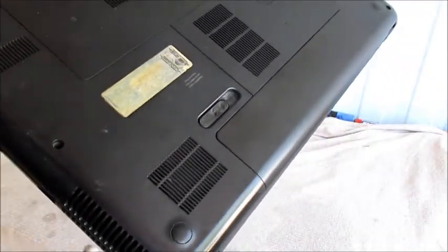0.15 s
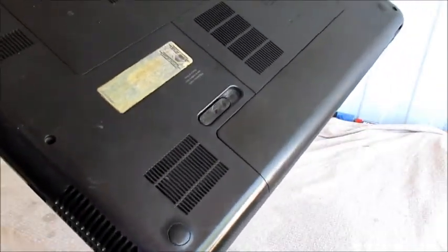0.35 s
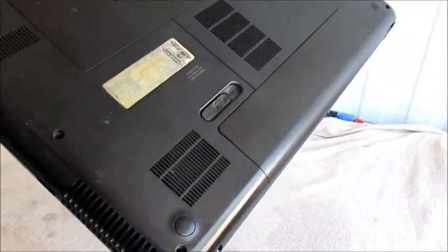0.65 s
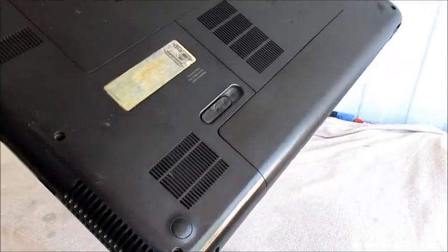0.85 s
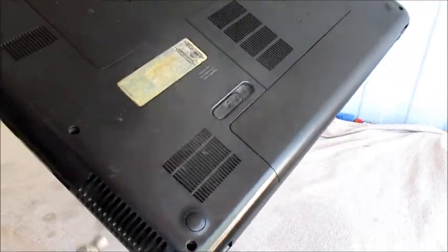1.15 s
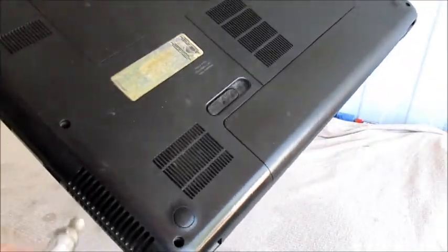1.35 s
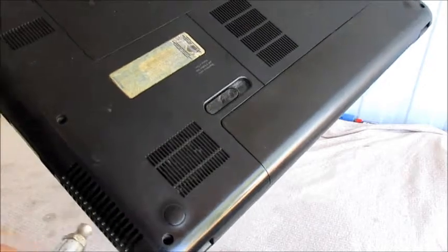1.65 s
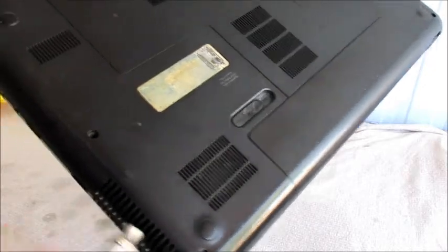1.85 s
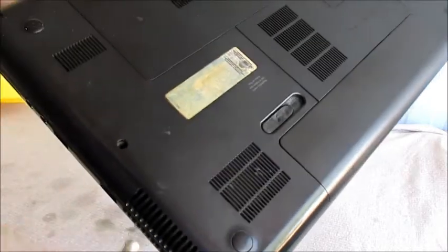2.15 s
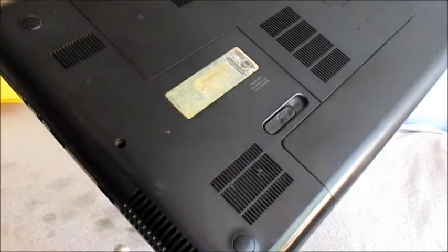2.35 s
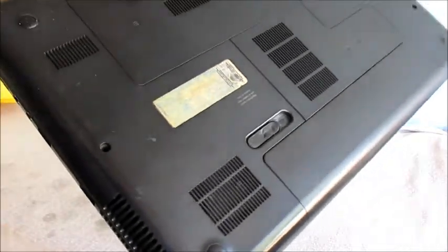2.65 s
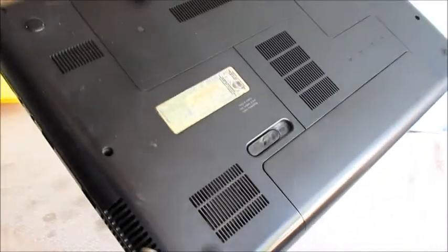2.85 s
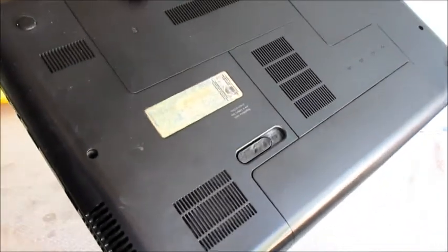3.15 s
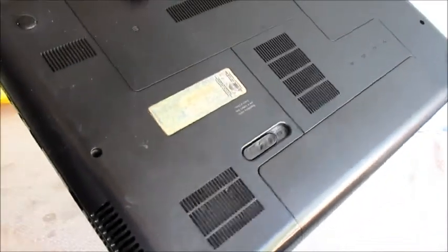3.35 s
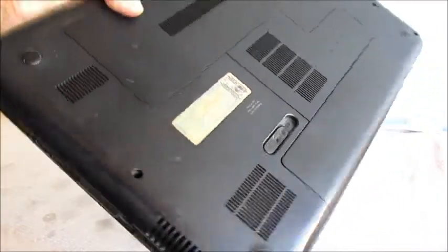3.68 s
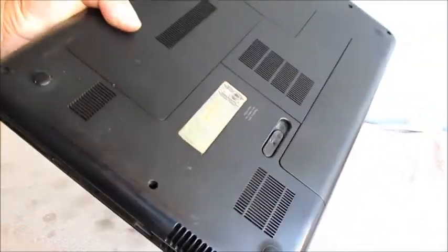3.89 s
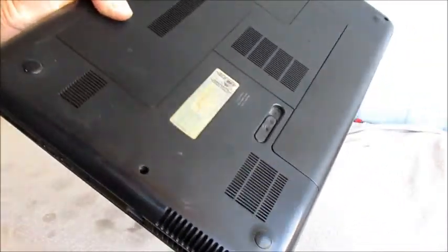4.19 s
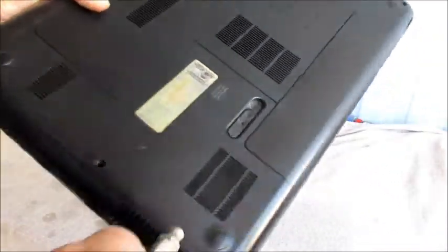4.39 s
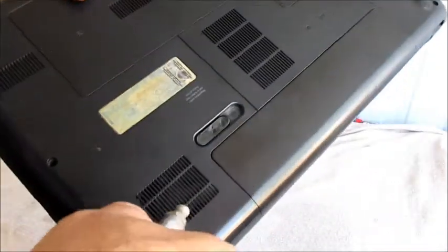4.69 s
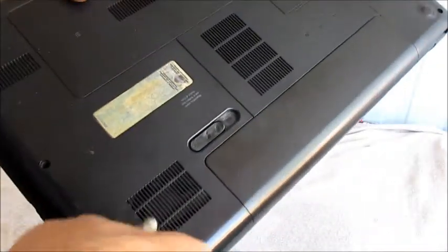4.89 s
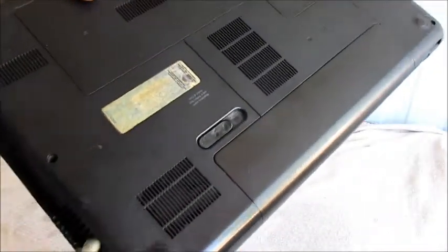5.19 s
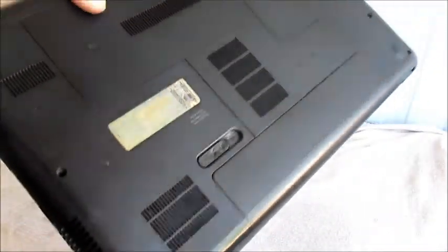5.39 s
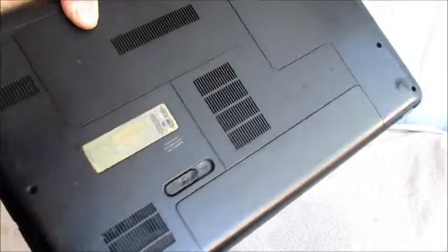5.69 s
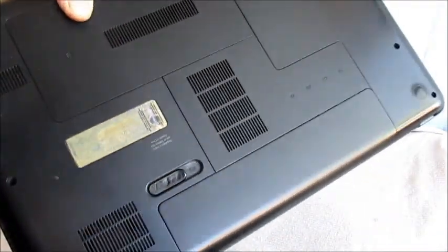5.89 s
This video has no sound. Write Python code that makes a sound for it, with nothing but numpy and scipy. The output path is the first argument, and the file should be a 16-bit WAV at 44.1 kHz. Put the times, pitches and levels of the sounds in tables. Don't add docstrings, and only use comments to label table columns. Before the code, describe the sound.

Repeated harsh bursts of compressed air hiss and roar into a plastic laptop vent, the first spinning its fan into a brief whine.

```python
import sys
import numpy as np
from scipy import signal
from scipy.fft import rfft, irfft, next_fast_len
from scipy.io import wavfile

SR = 44100
rng = np.random.default_rng(int(sys.argv[2]) if len(sys.argv) > 2 else 0)


def how_loud(loudness_db):
    steps = np.asarray(loudness_db, float) / 20
    return 10 ** steps


def to_wav(sig):
    pcm = np.clip(np.atleast_2d(sig), -1, 1) * 32767
    pcm = np.round(pcm).astype(np.int16)
    wavfile.write(sys.argv[1], SR, pcm.T)


N = 265923
SIZE = next_fast_len(N)
HZ = np.maximum(np.arange(SIZE // 2 + 1) * SR / SIZE, 1.0)
TIME = np.arange(N) / SR
CONTROL_STEP = 64


def rms_one(x):
    return x / np.sqrt(np.mean(x ** 2) + 1e-20)


def in_time(rows, off=None):
    s, *columns = np.transpose(rows)
    return [np.interp(TIME, s, c, left=off, right=off) for c in columns]


def at_hz(points, hz):
    p = np.array(points, float)
    return np.interp(np.log(hz), np.log(np.maximum(p[:, 0], 1.0)), p[:, 1])


def white():
    return rfft(rng.standard_normal(SIZE))


def drift(rate_hz):
    r = np.exp(-80 * np.pi * rate_hz / SR)
    noise = rng.standard_normal(N // 40 + 2002)
    slow = signal.lfilter([1], [1, -2 * r, r * r], noise)[2000:]
    return np.interp(np.arange(N) / 40, np.arange(len(slow)), rms_one(slow))


def humps(s, half_s):
    coarse_s = np.arange(N // CONTROL_STEP + 2) * CONTROL_STEP / SR
    distance = (coarse_s - s[:, None]) / np.maximum(half_s[:, None], .005)
    return np.exp(-.5 * distance ** 2)


def full(coarse):
    return np.interp(np.arange(N) / CONTROL_STEP, np.arange(len(coarse)), coarse)


JET_CENTRES_HZ = [1700, 3600, 6800, 12500]
FREE_JET_DB = [-12.5, -10, -1.9, 1]
# pitch_hz, level_db (per Hz)
JET_COLOUR = [(290, -25), (500, -20.5), (1040, -11), (1590, 0), (2100, -5.5), (3110, -3), (3660, 0.5),
              (4230, -1.5), (5430, 5.5), (7380, 6.5), (7940, 10), (10200, 4.5), (13400, 9), (15800, 6.5),
              (16500, -51.5)]
# pitch_hz, shared_part (0-1)
PORT_LIKENESS = [(500, .7), (1400, .82), (2100, .95), (2600, .65), (3700, .8), (6000, .7), (12000, .68),
                 (15500, .55)]


def jet(patchy_db=1.29, flutter_db=0.74):
    flow_db = flow()
    ports = at_ports(white() * how_loud(at_hz(JET_COLOUR, HZ)), at_hz(PORT_LIKENESS, HZ))
    power = np.mean(np.abs(ports) ** 2, axis=0) * 2 / SIZE ** 2
    edges_hz = [1100, 2600, 4800, 9500, 16000]
    part_db = [10 * np.log10(power[(HZ > a) & (HZ < b)].sum()) for a, b in zip(edges_hz, edges_hz[1:])]
    out, together, last = 0, drift(25.0), drift(9.0)
    third = np.minimum(np.log2(HZ) * 3, 42)
    for k in range(27, 43):
        hz = np.clip(2 ** (k / 3), JET_CENTRES_HZ[0], 16000)
        free_db = at_hz(list(zip(JET_CENTRES_HZ, FREE_JET_DB)), hz)
        raw_db = at_hz(list(zip(JET_CENTRES_HZ, part_db)), hz)
        level_db = flow_db + strikes(hz, free_db) - raw_db
        own = drift(4.4)
        flicker_db = patchy_db * (own + 1.2 * last) + flutter_db * together
        mask = np.sqrt(np.clip(1 - np.abs(third - k), 0, 1))
        out = out + how_loud(level_db + flicker_db) * irfft(ports * mask, SIZE)[:, :N]
        last = own
    return out


# time_s, level_db
FLOW = [
    [(-0.001, -22.5), (0.137, -23), (0.184, -22), (0.351, -28.5), (0.458, -27), (0.535, -23)],
    [(0.94, -20), (1.066, -25), (1.125, -23), (1.237, -24.5), (1.4, -23.5), (1.448, -23.5), (1.615, -26.5),
     (1.721, -28.0), (1.8, -25)],
    [(1.961, -26.5), (2.081, -21.5), (2.172, -31), (2.213, -24), (2.327, -26), (2.399, -25), (2.482, -24.5),
     (2.629, -36.5), (2.69, -20)],
    [(2.815, -17), (2.904, -29), (2.96, -28.5), (3.048, -22), (3.195, -27), (3.28, -31.5), (3.31, -31.5),
     (3.452, -30), (3.515, -20.5)],
    [(3.879, -23.5), (3.987, -29), (4.116, -31), (4.163, -29), (4.267, -25.5), (4.41, -39.5),
     (4.469, -31.5)],
    [(4.599, -25.5), (4.721, -27.5), (4.812, -21), (4.887, -31.5), (4.96, -23.5), (5.065, -32),
     (5.177, -35), (5.268, -31), (5.33, -32.5)],
    [(5.829, -24.5), (5.955, -22), (6.019, -28.5)],
]


def flow():
    points = sorted(tuple(row) for sweep in FLOW for row in sweep)
    return in_time(points)[0] + valve()


# opens_s, held_back_before_db, creep_before_db_per_s, released_s, closing_db_per_s
TRIGGER = [
    (-.2, -12, 1000, .534, 1200),
    (.933, -12, 2500, 1.815, 330),
    (1.95, -12, 2500, 2.697, 650),
    (2.807, -19, 200, 3.524, 1100),
    (3.869, -14, 2500, 5.335, 560),
    (5.814, -12, 600, 6.5, 500),
]
RUSH_DB = [
    0,
    6.5,
    3,
    0.5,
    8,
    1,
]


def valve(rise_s=0.0017, rush_s=0.0083, bleed_db=-11, bleed_db_per_s=306):
    pulls = []
    for (s, held_db, creep, end, closing), rush_db in zip(TRIGGER, RUSH_DB):
        since, after = TIME - s, np.maximum(TIME - end, 0)
        opening = np.interp(since, [-1, -rise_s, 0], [held_db - creep, held_db, rush_db])
        spent = np.where(since > 0, rush_db * (1 - np.exp(-np.abs(since) / rush_s)), 0)
        release = np.maximum(-closing * after, bleed_db - bleed_db_per_s * after)
        pulls.append(opening - spent + release)
    return np.max(pulls, axis=0)


# time_s, half_length_s, level_db (over the flow), colour_octaves (over 1 kHz)
STRIKES = [(0.152, 0.037, -2.5, 2.44), (0.394, 0.019, -1, 2.1), (0.447, 0.064, -1.5, 2),
           (0.988, 0.022, -3.3, 2.33), (1.05, 0.029, 3.9, 2.62), (1.248, 0.025, -4, 2.5),
           (1.454, 0.03, 0.5, 2.87), (1.595, 0.038, -0.5, 2.83), (1.754, 0.12, -10, 1.6),
           (1.972, 0.024, 7.5, 2.25), (2.143, 0.015, 8, 2.8), (2.245, 0.053, 2.2, 3.03),
           (2.574, 0.043, 10.5, 3), (2.64, 0.021, 5, 1.5), (2.866, 0.018, 3.5, 2.6), (2.926, 0.03, 4, 1.2),
           (3.15, 0.13, -4.5, 1.8), (3.46, 0.063, -4.5, 2.8), (3.929, 0.023, 3.5, 1.82),
           (4.135, 0.022, 4, 0.4), (4.228, 0.044, 4, 3.08), (4.317, 0.011, 12, 2.75),
           (4.404, 0.036, 12.5, 1.95), (4.517, 0.037, 0.6, 1.27), (4.658, 0.049, 7, 2.86),
           (4.888, 0.029, 2.5, 2.03), (5.013, 0.0078, 1.5, 2.54), (5.152, 0.022, -1.5, 1.7),
           (5.327, 0.03, 7, 1.8), (6.01, 0.03, 5.5, 2.31)]
# time_s, level_db (over the flow)
FLICKS = [
    (.29, -6),
    (1.79, -1.5),
    (1.99, -7),
    (2.57, 11.5),
    (3.885, 3.5),
    (4.165, 8.5),
    (4.82, -12),
    (5.14, -7),
    (5.28, 6),
]
STRIKE_FALL_DB = (3.5, 2)


def strikes(hz, free_db, flick_half_s=0.0062, flick_octave=2.92, top_hz=8800, top_db=2.5):
    flicks = [(s, flick_half_s, db, flick_octave) for s, db in FLICKS]
    s, half_s, db, octave = np.transpose(list(STRIKES) + flicks)
    off = np.log2(hz / 1000) - octave
    fall_db = np.where(off < 0, *STRIKE_FALL_DB) * off ** 2
    fall_db = fall_db + top_db / (1 + (top_hz / hz) ** 12)
    struck = how_loud(db - fall_db) ** 2 @ humps(s, half_s)
    return full(10 * np.log10(how_loud(free_db) ** 2 + struck))


def off_the_case(x, share=0.24, lag_s=0.000437, wander=0.28):
    both = drift(2.3)
    lags = [lag_s * SR * np.exp(wander * both + 0.068 * drift(6.9)) for side in range(2)]
    bounced = [np.interp(np.arange(N) - lag, np.arange(N), v) for v, lag in zip(x, lags)]
    return (x + share * np.array(bounced)) / np.sqrt(1 + share ** 2)


# pitch_hz, left_leads_radians
PORT_PHASE = [(700, 0), (1500, .4), (2250, -.2), (2950, 1.0), (3950, .35), (4700, 1.4), (5350, .8),
              (6050, 1.9), (7300, 1.3), (8450, 2.1), (9200, 1.7), (9800, 2.4), (10500, 1.5), (15000, 1.9)]
# pitch_hz, left_minus_right_db
PORT_BALANCE = [(500, 1), (1200, -3), (2100, -.3), (2600, -6.5), (3400, 0), (4300, -2.5), (5150, 1),
                (5700, -1.5), (7200, 3), (7900, 1.3), (11300, 5.8), (12200, 3.2), (12900, 4), (14500, -.4)]


def at_ports(shared, alike):
    alike = np.clip(alike, 0, 1)
    turn = np.exp(.5j * at_hz(PORT_PHASE, HZ)) * how_loud(at_hz(PORT_BALANCE, HZ) / 2)
    own = []
    for side in range(2):
        echo = np.abs(shared) * np.exp(2j * np.pi * rng.random(len(HZ)))
        own.append(np.sqrt(alike) * shared + np.sqrt(1 - alike) * echo)
    return np.array([own[0] * turn, own[1] / turn])


# time_s, blade_rate_hz, level_db, overtones_db (relative)
FAN = [
    (.19, 690, -56, -12),
    (.21, 755, -47, -12),
    (.276, 950, -45, -14),
    (.326, 1006, -50, -10),
    (.372, 935, -41, 3),
    (.41, 760, -39, 6),
    (.46, 590, -38, 1),
    (.51, 490, -44, 0),
    (.555, 400, -52, -4),
]
# pitch_hz, width_hz, lift_db
GRILLE = (1650, 480, 17)
# start_s, length_s, from_hz, to_hz, level_db
WHISTLES = [
    (1.629, .07, 1060, 1204, -46),
    (2.279, 0.093, 1100, 1280, -38.5),
    (2.461, 0.11, 1660, 1670, -34.5),
    (3.235, 0.069, 650, 630, -47.5),
    (3.324, 0.035, 600, 570, -44),
    (3.372, 0.098, 610, 623, -49.5),
    (3.439, 0.058, 630, 650, -47),
]
# start_s, length_s, from_hz, to_hz,
# level_db
BREATHY_TONES = [
    (3.71, 0.1, 3800, 3690, -62.5),
    (5.64, .07, 3300, 3600, -62.5),
    (5.69, 0.082, 3950, 3950, -60),
    (4.2, 0.022, 3600, 6900, -61.5),
]


def whines(overtone_loss_db=3):
    hz, level_db, over_db = in_time(FAN, off=-120)
    centre, width, lift_db = GRILLE
    out = tone(hz, level_db, waver=0.0055)
    for k in range(2, 6):
        lift = lift_db / (1 + (2 * (hz * k - centre) / width) ** 2)
        out = out + tone(hz * k, level_db + over_db + lift - overtone_loss_db * k, waver=.004)
    out = out + sum(tone(*glide(*w), waver=.005) for w in WHISTLES)
    out = out + sum(tone(*glide(*w), waver=.05, rate_hz=300.0) for w in BREATHY_TONES)
    return irfft(at_ports(rfft(out, SIZE), 1.0), SIZE)[:, :N]


def tone(hz, level_db, waver, rate_hz=34.0):
    gain = np.sqrt(2) * how_loud(level_db + 1.1 * drift(22.0))
    phase = 2 * np.pi * np.cumsum(hz * (1 + waver * drift(rate_hz))) / SR
    return gain * np.sin(phase)


def glide(s, length, from_hz, to_hz, db, fade_db_per_s=894):
    edge = np.minimum(TIME - s, s + length - TIME)
    hz = np.interp(TIME, [s, s + length], [from_hz, to_hz])
    return hz, db + fade_db_per_s * np.minimum(edge - .015, 0)


# pitch_hz, level_db (per Hz)
GUST_COLOUR = [(22, -33), (38, -7), (130, -3), (300, -1), (550, -0.5), (1000, -5), (1500, -11), (2600, -45),
               (5000, -74)]


def gusts(lumpy_db=3.0):
    opposed = .3 - .45 * HZ ** 2 / (HZ ** 2 + 300 ** 2)
    left, right = white(), white()
    mixed = np.array([left - opposed * right, right - opposed * left])
    pair = irfft(mixed * how_loud(at_hz(GUST_COLOUR, HZ)), SIZE)[:, :N]
    lumps = how_loud(lumpy_db * np.array([drift(31.0), drift(22.5)]))
    return rms_one(pair) * buffeting() * lumps


# time_s, half_length_s, level_db
PUFFS = [(0.047, 0.019, -40), (0.167, 0.02, -35), (0.44, 0.028, -50), (1.047, 0.044, -28.5),
         (1.14, 0.065, -42), (1.307, 0.063, -39), (1.453, 0.018, -32.5), (1.59, 0.031, -36.5),
         (1.8, 0.026, -39), (1.99, 0.017, -40.5), (2.107, 0.03, -36), (2.234, 0.02, -37.5),
         (2.573, 0.016, -37), (2.713, 0.074, -55), (2.88, 0.04, -40.5), (3.038, 0.019, -43),
         (3.46, 0.051, -51), (3.928, 0.043, -52), (4.08, 0.042, -44.5), (4.464, 0.07, -55),
         (4.68, 0.015, -41), (4.98, 0.013, -37), (5.343, 0.012, -48), (5.86, 0.026, -34), (6, 0.062, -38.5)]


def buffeting(draught_db=-21):
    s, half_s, db = np.transpose(PUFFS)
    puffs = full(how_loud(db) ** 2 @ humps(s, half_s))
    return np.sqrt(how_loud(flow() + draught_db) ** 2 + puffs)


def walls(x, t60_s=0.32, echo_db=-16.5, cut_hz=4000):
    tail = rng.standard_normal((2, N)) * how_loud(-60 * TIME / t60_s)
    tail = tail / np.sqrt(np.sum(tail ** 2, axis=1, keepdims=True))
    size = next_fast_len(2 * N)
    dull = 1 / (1 + 1j * np.arange(size // 2 + 1) * SR / size / cut_hz)
    return how_loud(echo_db) * irfft(rfft(x, size) * rfft(tail, size) * dull, size)[:, :N]


# pitch_hz, level_db (per Hz)
ROOM = [(18, -43), (30, -1.5), (65, -4), (123, -3.5), (156, -10), (221, -3.5), (398, -8.5), (505, -12.5),
        (742, -14.5), (2400, -28), (3120, -75), (5280, -120)]
# pitch_hz, likeness (-1 to 1)
ROOM_LIKENESS = [(60, 0.56), (130, 0.75), (290, 0.96), (640, 0.72), (1410, -0.029), (3100, 0.069),
                 (6820, -0.3), (15000, -0.33)]
# time_s, level_db
ROOM_SWELL = [(0, -3.5), (.8, 3.5), (1.9, -1), (3.6, -2.5), (3.73, 1.5), (3.85, -0.5), (5.5, 0), (6.03, -6)]
# pitch_hz, width_hz, level_db
LEAK = [(3100, 1700, -65.5), (5090, 260, -72.5), (6200, 800, -79), (6760, 2000, -69), (8450, 740, -62),
        (9650, 730, -74), (12200, 500, -78), (15100, 1500, -65)]


def room(room_db=-49.5):
    alike = np.clip(at_hz(ROOM_LIKENESS, HZ), -1, 1)
    mid, side = white() * np.sqrt(1 + alike), white() * np.sqrt(1 - alike)
    pair = np.array([mid + side, mid - side])
    rumble = rms_one(irfft(how_loud(at_hz(ROOM, HZ)) * pair, SIZE)[:, :N])
    bands = 0
    for hz, width, db in LEAK:
        gain = how_loud(db) * np.sqrt(SR / 2 / width / SIZE)
        bands = bands + gain / (1 + (2 * (HZ - hz) / width) ** 4)
    leak = irfft(np.array([white(), white()]) * bands * np.sqrt(SIZE), SIZE)[:, :N]
    swell_db, = in_time(ROOM_SWELL)
    return how_loud(room_db + swell_db + 0.43 * drift(20.0)) * rumble + leak


# time_s, left_minus_right_db
PAN = [(0.0, 6), (0.89, 4.5), (1.48, 7), (2.94, 4), (3.53, 5.5), (3.78, 5.5), (4.62, 4), (5.0, 5.5),
       (6.03, 4.5)]


def scene():
    pan_db, = in_time(PAN)
    swing = how_loud(np.outer([.5, -.5], pan_db - pan_db.mean()))
    near = (off_the_case(jet()) + whines()) * swing
    return near + walls(near) + gusts() + room()


def low_pass(x):
    return signal.sosfilt(signal.butter(12, 17010, fs=SR, output="sos"), x)


# pitch_hz, half_width_hz, floor_db
NOTCH = (7885, 95, -21)


def record(dry, cutoff_hz=15900):
    hz, width, floor_db = NOTCH
    away = (HZ - hz) ** 2
    notch = np.sqrt((away + (how_loud(floor_db) * width) ** 2) / (away + width ** 2))
    shape = notch / np.sqrt(1 + (HZ / cutoff_hz) ** 200)
    rounded = 1.1 * np.tanh(dry / 1.1)
    mix = irfft(rfft(rounded, SIZE) * shape, SIZE)[:, :N]
    return low_pass(mix)


dry = scene()
out = record(dry)
to_wav(out)
```